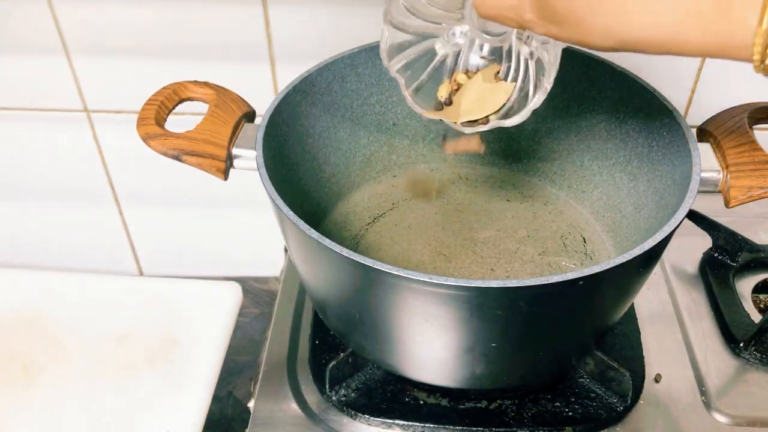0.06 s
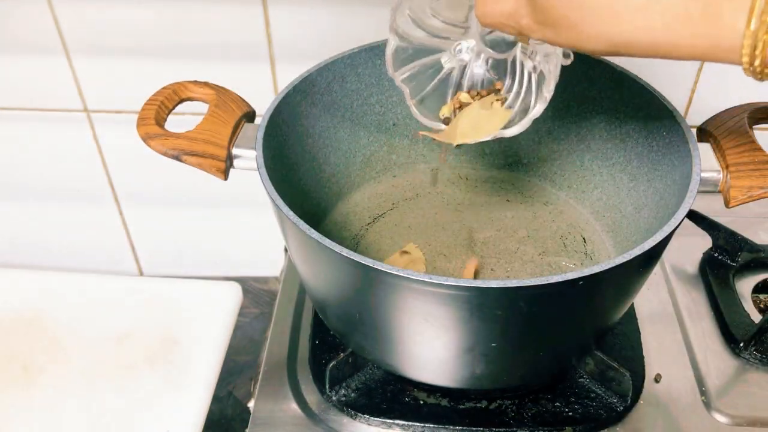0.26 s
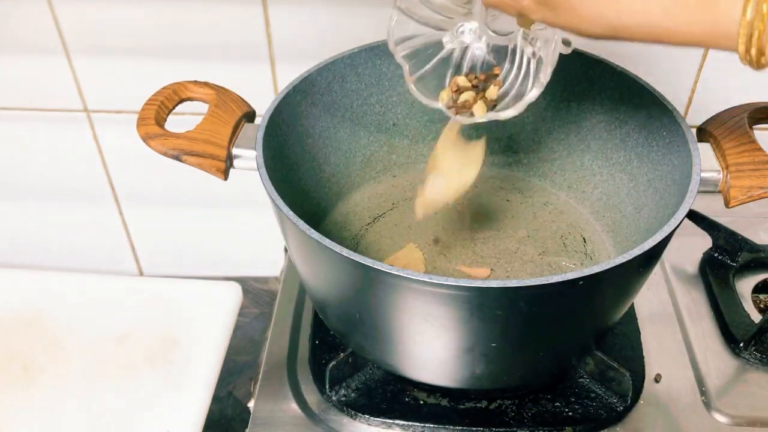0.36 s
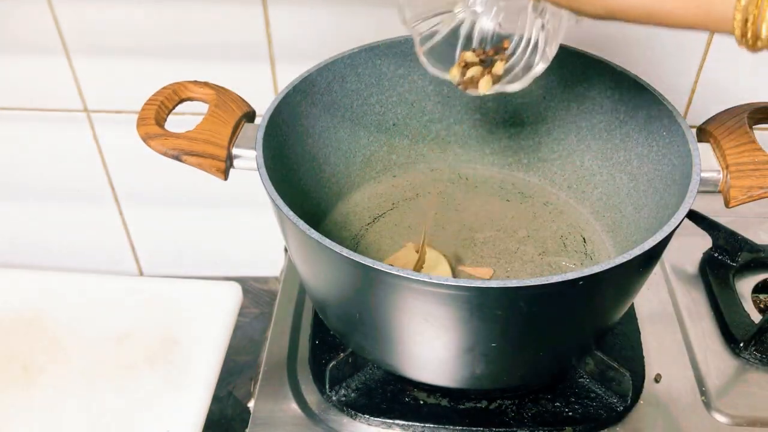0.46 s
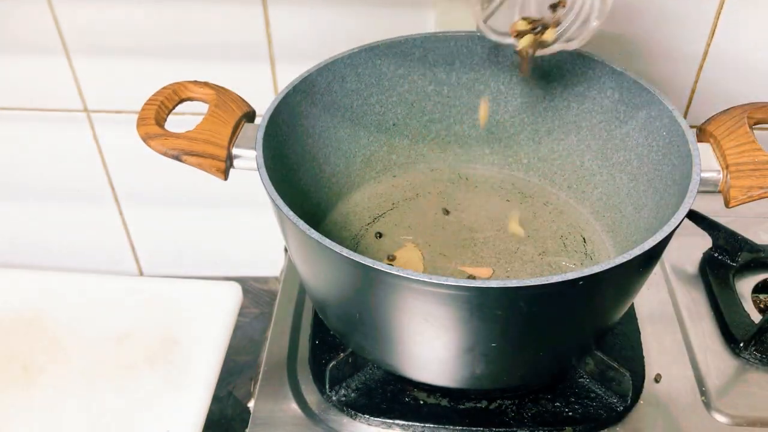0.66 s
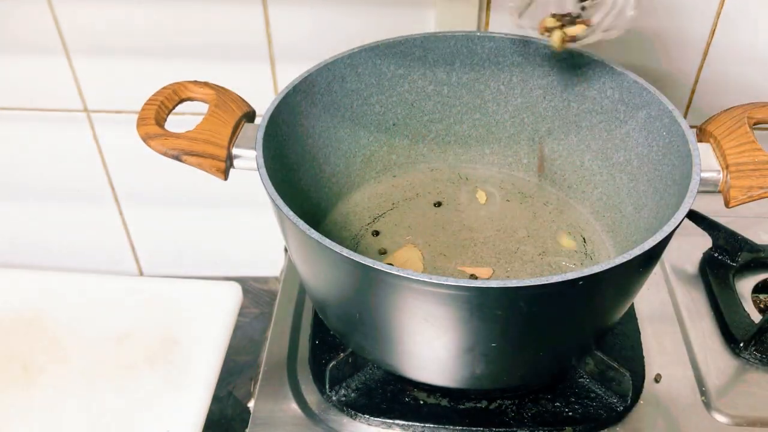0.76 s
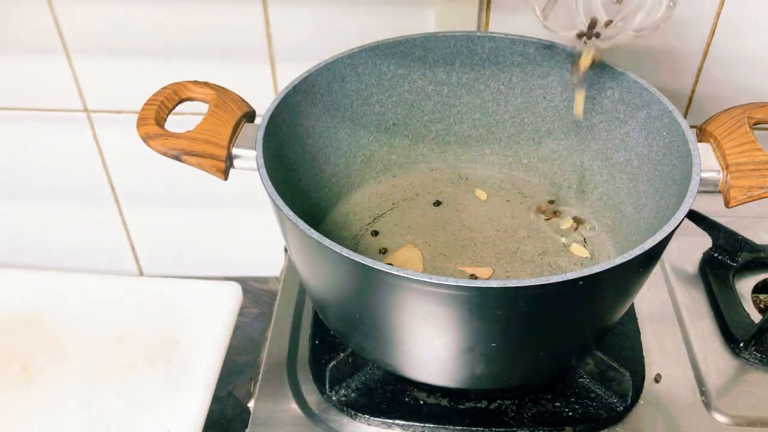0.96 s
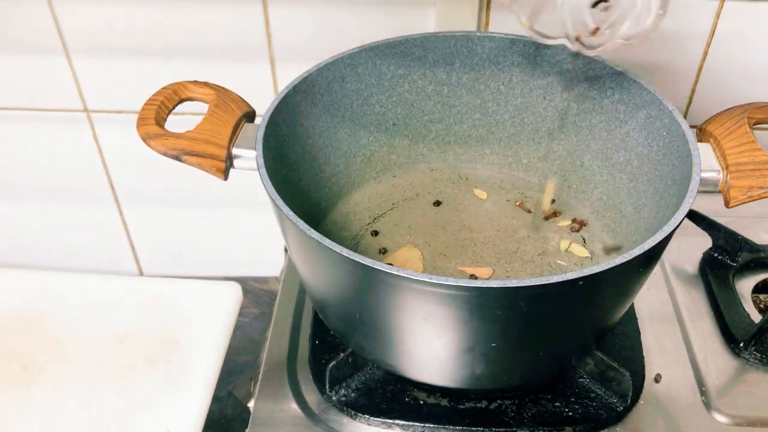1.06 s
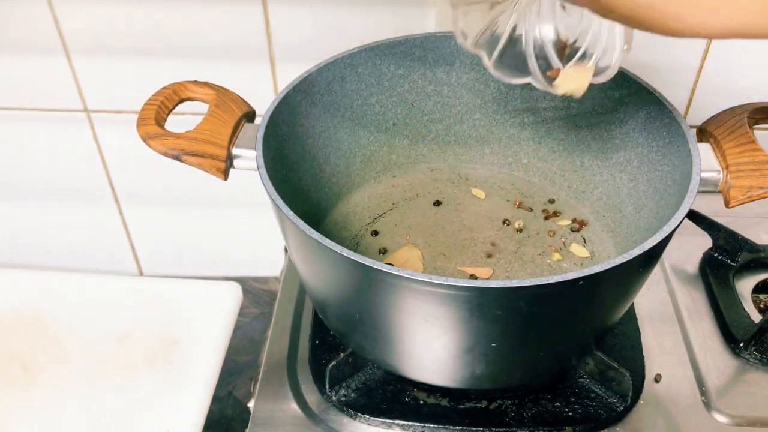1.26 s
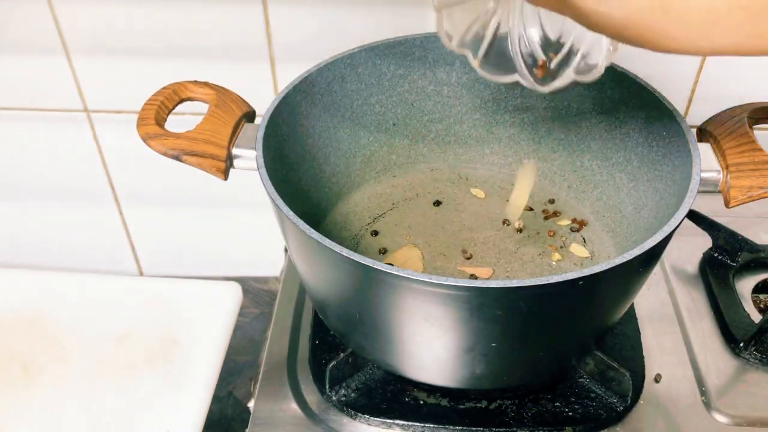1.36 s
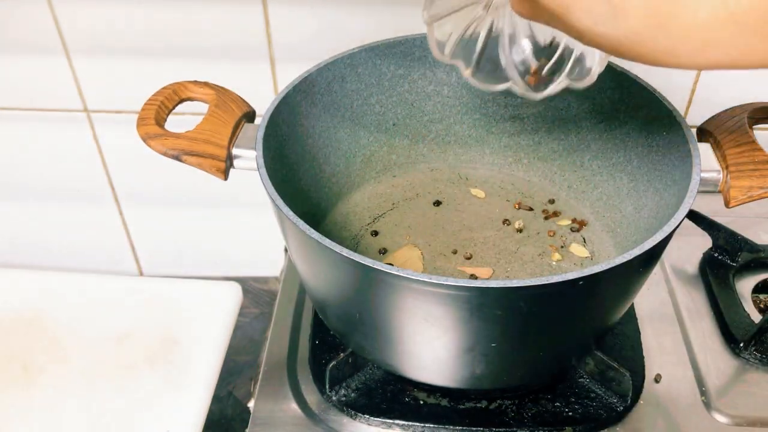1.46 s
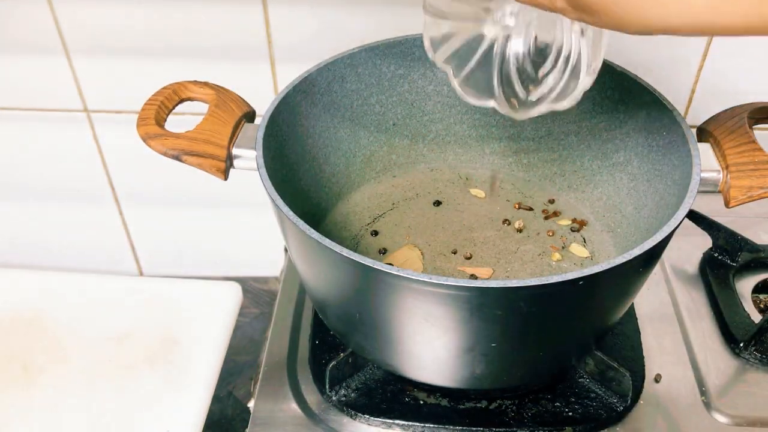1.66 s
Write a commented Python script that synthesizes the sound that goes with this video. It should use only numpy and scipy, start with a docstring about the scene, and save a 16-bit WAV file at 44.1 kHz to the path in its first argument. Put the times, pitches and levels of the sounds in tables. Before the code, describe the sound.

Small hard spices and seeds drop into a metal pot with ringing clinks.

```python
"""First come brief, soft rustles as whole spices slide out of a glass bowl in a small kitchen.
Then they clatter into a metal pot with a film of oil. Each piece makes the pot's base ring with many
tones (its modes), in a mix that depends on where it lands. Small seeds patter in between, and there
are two dry snaps. Behind it all are a faint fizz of warm oil, a low room noise and a thin steady tone."""
import sys
import numpy as np
from scipy import signal
from scipy.fft import rfft, irfft, next_fast_len
from scipy.io import wavfile

SR = 44100
rng = np.random.default_rng(int(sys.argv[2]) if len(sys.argv) > 2 else 0)


def wav_out(sig):
    """Save sig, one row per channel (or a flat mono array), as 16-bit PCM at SR to the path in sys.argv[1]."""
    wavfile.write(sys.argv[1], SR, np.round(np.clip(np.atleast_2d(sig).T, -1, 1) * 32767).astype(np.int16))


N = 74970

# Tone colours of the steady noises (frequency [Hz], level [dB])
ROOM_RUMBLE = [(20, -50), (33, -19), (48, 0), (60, -9), (100, 3.5), (145, -3.5), (300, 1), (450, -7.5),
               (700, -13), (1500, -36)]
OIL_AND_AIR = [(300, 8.5), (600, 2.5), (1500, 2.5), (2100, 1.5), (3200, -0.5), (5000, 4), (6700, -1.5),
               (8700, -6.5), (10500, -17), (15000, -6)]
# How long the room echoes (frequency [Hz], time to fade by 60 dB [s])
ECHO_TIMES = [(300, 0.74), (2500, 0.47), (7000, 0.36), (15000, 0.27)]
# Spices sliding on the glass (time [s], width [s], level [dB])
SLIDES = [(.045, 0.01, -58.5), (0.079, 0.0013, -48.5), (0.095, 0.0086, -59), (0.209, 0.0076, -51.5)]
# Dry snaps (time [s], peak level [dB])
SNAPS = [(0.7743, -17), (1.1375, -22.5)]
# Tone colours of the short noises (frequency [Hz], level [dB])
GLASS_COLOUR = [(1500, -33), (2000, -27), (2150, 7), (2350, -27), (4000, -12), (5100, -2), (5800, -4),
                (6700, 2), (9000, -18), (11000, -20), (15000, -16)]
SNAP_COLOUR = [(300, -32), (2000, -23), (3500, 2), (5500, 1.5), (8000, -4.5), (10500, -18.5), (15500, -4.5)]
KNOCK_COLOUR = [(200, -38), (450, -21), (560, -18), (700, 1), (900, -5), (1200, 0.5), (1500, -14),
                (1950, -2), (3000, -27)]
CRACK_COLOUR = [(200, -64), (550, -18), (1200, -13), (1600, -21.5), (3000, -9), (5000, -4), (6700, -5),
                (8200, -2), (9700, -15), (12000, -9.5), (14200, -12), (15400, -5.5)]
# The pot's modes (frequency [Hz])
MODE_HZ = [559, 681, 1185, 1228, 1934, 2566, 2900, 3465, 3932, 4425, 4658, 4955, 5238, 5412, 6320, 6470,
           6790, 6876, 7410, 8053, 8460, 10290, 10960, 11800, 12350, 13240, 15150]
# How long each mode rings (time to fade by 60 dB [s])
MODE_T60 = [0.2, 0.33, 0.035, 0.19, 0.57, 0.33, 0.17, 0.18, 0.089, 0.2, 0.29, 0.094, .18, 0.04, 0.08, 0.036,
            0.08, 0.12, 0.083, 0.034, 0.15, 0.03, 0.063, 0.055, 0.054, .06, 0.026]
# For each landing spot, how strongly each mode rings (level [dB])
MODE_DB_BY_SPOT = { "left": [-30, -15.5, -8, -13, -17, -20.5, -16.5, -3, -17, -5.5, -15, -35, -5, -8.5, -7,
                   -15.5, -3.5, -12, -10, -16, -16.5, -22, -27, -17.5, -26, -22, -25], "middle": [-18.5,
                   -9.5, -11.5, -14.5, -25.5, -8.5, -10.5, -7.5, -19, -16, -27, -39, -4, -17, -6, -5, -1,
                   -0.5, -6, -16, -11.5, -25, -15, -8, -22, -20, -12], "right": [-28, -15, -37, -12, -13,
                   -12.5, -2.5, -10, -2.5, -12, -25, -18, -9, -8, -3, 1, -6, -6, -14, -11, -31.5, -29, -51,
                   -26, -30, -31, -40], "centre": [-20.5, -8, -28, -19, -31, 0, -7.5, -5, -15, -28, -32,
                   -32, -11, -7, -13, -7.5, -2.5, -2.5, -2.5, -30, -28, -38, -18.5, -34, -13.5, -23, -26]}
# Pours of small seeds (start [s], end [s], strength [dB])
SEED_POURS = [(.25, .6, -38.5), (1.038, 1.42, -49.5)]
# Larger pieces landing (time [s], spot, strength [dB], weight [dB], brightness [dB], hardness [dB])
LANDINGS = [(.137, "middle", -27, 12.5, -20, -2.5), (.169, "right", -35.5, 6, -15, 4),
            (.2192, "left", -20, 5.5, 6, -14), (0.2241, "left", -10, 3.5, -4, 4.5),
            (.228, "left", -21.5, 3, 11, 13), (.3225, "left", -22, 9.5, -22, -14),
            (0.3483, "middle", -19.5, 5, -0.5, -13), (0.353, "left", -22, 3, 4, 0),
            (.3745, "middle", -15, -10.5, -6.5, 7.5), (0.376, "centre", -30, -34, 9, 2),
            (.392, "middle", -20.5, 1.5, -4, -4), (.4045, "left", -23.5, 10, 9.5, 11),
            (.461, "centre", -19.5, 4, -3, -10), (0.468, "middle", -24, -10, -2, 7),
            (.4805, "centre", -19, 3, 7.5, 8.5), (0.485, "middle", -34, 5, -9, 12),
            (.494, "centre", -20, -2, -8, 1), (0.5266, "centre", -26.5, 4.5, 7.5, 10),
            (.566, "middle", -26, 4.5, -3, -2), (.582, "left", -32.5, 7.5, 0, -6),
            (.589, "left", -34.5, -26, -1, 2), (0.6091, "centre", -21.5, 0.5, -1.5, 3),
            (.691, "right", -39, 8, 6.5, -6), (.7155, "middle", -41.5, 25.5, -1, 4),
            (.725, "left", -33.5, 14.5, 3.5, -18), (0.837, "right", -30, -2, -3, 4.5),
            (.845, "right", -21, 0, 1.5, 4), (.848, "centre", -22, -33, -11, -1),
            (.858, "right", -25, -37, -14, 9), (.969, "right", -37.5, -10, 4.5, 11.5),
            (0.977, "right", -33.5, -6, -3, 1), (1.0047, "right", -10.5, -6.5, -6.5, 4.5),
            (1.008, "right", -15, -7.5, -8.5, -26), (1.032, "right", -22, -17, 1.5, -10),
            (1.094, "right", -24, 0, -8, 0.5), (1.124, "right", -34, 10, 8, -10),
            (1.138, "right", -34, 21.5, 14, 5), (1.166, "right", -30, 15, -21, -8),
            (1.189, "right", -21.5, 8.5, 5.5, 3.5), (1.2248, "right", -28.5, 6.5, 5, 16.5),
            (1.264, "right", -33, 3, 7, 8), (1.271, "left", -26.5, 7.5, -7, 6),
            (1.309, "centre", -32, 4.5, -24, -20), (1.339, "left", -22, 4.5, -2, 1),
            (1.341, "middle", -40.5, 2.5, -18, -4), (1.355, "right", -33.5, -20, 2, 5),
            (1.378, "right", -39, 12, 3, 3), (1.409, "right", -43, -25, 9, 14),
            (1.431, "right", -37.5, -10, 5, 11.5), (1.457, "right", -39, -7, 3.5, 6),
            (1.49, "right", -36, 5.5, -7, 4.5), (1.565, "right", -38.5, -24, 10.5, 8.5),
            (1.6275, "right", -38.5, -4, -4, -14), (1.658, "right", -45.5, -19, 3.5, -20)]


def amp(db):
    """Turn decibels into a number to multiply by."""
    return 10 ** (np.asarray(db) / 20)


def along(points, hz):
    """Read between a table's rows, on a log frequency scale."""
    freqs, values = np.transpose(points)
    return np.interp(np.log(hz + 1), np.log(freqs + 1), values)


def filtered(x, response):
    """Turn each frequency in x up or down by response(hz)."""
    size = next_fast_len(len(x) + 8192)
    hz = np.fft.rfftfreq(size, 1 / SR)
    return irfft(rfft(x, size) * response(hz), size)[:len(x)]


def noise(colour, size):
    """Noise with the given tone colour and an average (rms) level of 1."""
    x = filtered(rng.standard_normal(size), lambda hz: amp(along(colour, hz)))
    return x / np.sqrt(np.mean(x ** 2) + 1e-20)


def fade(t, t60):
    """Die away by 60 dB every t60 seconds."""
    return np.exp(-np.log(1000) * t / t60)


def background(whine_hz=987):
    """The room rumbles, warm oil fizzes faintly and a thin tone holds steady."""
    whine = np.sqrt(2) * np.sin(2 * np.pi * whine_hz * np.arange(N) / SR)
    return amp(-60.5) * noise(ROOM_RUMBLE, N) + amp(-62) * noise(OIL_AND_AIR, N) + amp(-73) * whine


def add(track, start_s, sound):
    """Mix a sound into the track at the given time."""
    part = track[max(round(start_s * SR), 0):][:len(sound)]
    part += sound[:len(part)]


def kitchen_echo(x, tails=12, delay_s=.002):
    """The tiled room's short echo, blended from several random tails to colour the pot's tones evenly."""
    out, hop = np.zeros(N), N / (tails - 1)
    for k in range(tails):
        hz, t, spectrum = signal.stft(rng.standard_normal(SR // 2), SR, nperseg=256)
        spectrum *= fade(t, along(ECHO_TIMES, hz)[:, None])
        tail = signal.istft(spectrum, SR, nperseg=256)[1]
        # Each stretch of sound gets its own random echo and blends into the next.
        near = np.flatnonzero(np.abs(np.arange(N) / hop - k) < 1)
        stretch = x[near] * np.cos(np.pi / 2 * (near / hop - k))
        add(out, near[0] / SR + delay_s, signal.fftconvolve(stretch, tail / np.linalg.norm(tail)))
    return out


def sliding_on_glass():
    """Spices rub along the bowl in brief rustles."""
    t = np.arange(N) / SR
    swells = sum(amp(db) * np.exp(-.5 * ((t - time) / width) ** 2) for time, width, db in SLIDES)
    return noise(GLASS_COLOUR, N) * swells


def dry_snaps():
    """Short clicks that do not ring the pot."""
    out, t = np.zeros(N), np.arange(SR // 20) / SR
    for time, db in SNAPS:
        click = noise(SNAP_COLOUR, len(t)) * fade(t, t60=.011)
        add(out, time, amp(db) * click / np.abs(click).max())
    return out


def pot_strike(spot, weight_db, bright_db, hardness_db):
    """One piece hits the pot: the modes ring over a dull knock, a short crack and a shimmer."""
    low_hz, high_hz = 1830, 5000  # weight lifts the modes below low_hz, brightness those above high_hz
    rise_cycles, contact_s, noise_rise_s = 2.88, .0011, .00029
    t = np.arange(SR // 3) / SR
    hz = np.array(MODE_HZ) * (1 + .002 * rng.standard_normal(len(MODE_HZ)))
    colour_db = weight_db / (1 + (hz / low_hz) ** 6) + bright_db / (1 + (high_hz / hz) ** 6)
    mode_db = MODE_DB_BY_SPOT[spot] + colour_db + rng.standard_normal(len(hz))
    gains = amp(mode_db) * (-1) ** np.arange(len(hz))  # neighbours start in opposite directions
    cycles = np.outer(hz, t)
    build_up = 1 - np.exp(-cycles / rise_cycles)
    modes = np.sin(2 * np.pi * cycles) * build_up * fade(t, np.array(MODE_T60)[:, None])
    early_boost = 1 + amp(8.5) * fade(t, t60=.053)  # the ring drops fast at first
    ring = amp(-17) * (gains @ modes) * early_boost * (1 - np.exp(-t / contact_s))
    # The knock comes from the oil-damped base, the shimmer from the wall's many weak modes.
    knock = amp(-31 + weight_db) * fade(t, t60=.057) * noise(KNOCK_COLOUR, len(t))
    crack_level = amp(-16 + hardness_db) * fade(t, t60=.038)
    shimmer_level = amp(-39.5) * fade(t, t60=.31)
    crack_and_shimmer = noise(CRACK_COLOUR, len(t)) * (crack_level + shimmer_level)
    return ring + (knock + crack_and_shimmer) * (1 - np.exp(-t / noise_rise_s))


def small_seeds(seeds_per_s=45, scatter_db=2.5):
    """Small seeds patter into the pot at random while the bowl is tipped."""
    out = np.zeros(N)
    hits = [pot_strike(spot, weight_db=8.5, bright_db=3, hardness_db=4)
            for spot in ("left", "middle", "right")]
    for start, end, db in SEED_POURS:
        gaps, sizes = rng.exponential(size=40), rng.standard_normal(size=40)
        for k, time in enumerate(start + np.cumsum(gaps) / seeds_per_s):
            if time < end:
                add(out, time, amp(db + scatter_db * sizes[k]) * hits[k % len(hits)])
    return out


def large_spices():
    """The larger pieces land one by one, and each rings the pot."""
    out = np.zeros(N)
    for time, spot, db, weight_db, bright_db, hardness_db in LANDINGS:
        add(out, time, amp(db) * pot_strike(spot, weight_db, bright_db, hardness_db))
    return out


def scene():
    """Mix the clatter, the snaps and their echo over the quiet sounds, in one channel."""
    quiet = background() + sliding_on_glass()
    snaps = dry_snaps()
    clatter = small_seeds() + large_spices()
    # The snaps are short and near, so less of them reaches the room.
    echo = amp(-6) * kitchen_echo(clatter + amp(-3.5) * snaps)
    return (clatter + snaps + echo + quiet)[None]


def record(dry):
    """Cut away the deepest bass and the highest treble."""
    bottom_hz, top_hz = 38, 15740
    band = lambda hz: 1 / np.sqrt((1 + (hz / top_hz) ** 200) * (1 + (bottom_hz / (hz + 1)) ** 10))
    return np.array([filtered(x, band) for x in dry])


dry = scene()
out = record(dry)
wav_out(out)
```